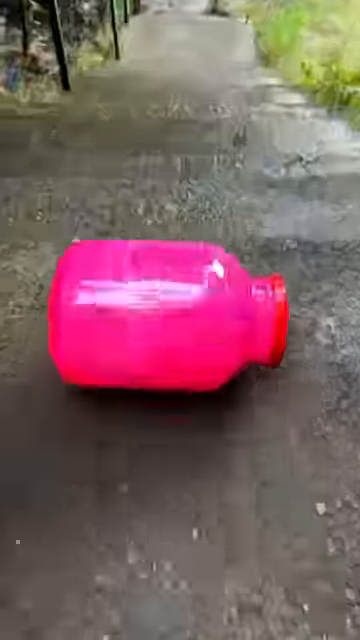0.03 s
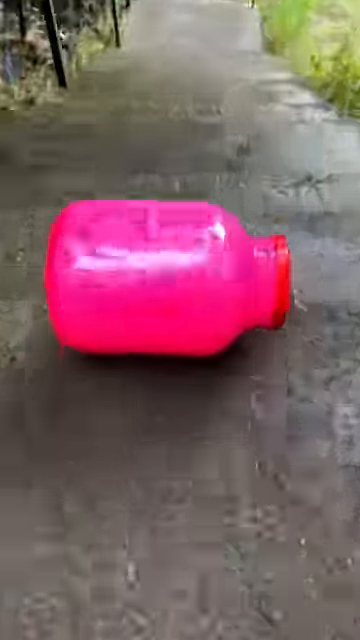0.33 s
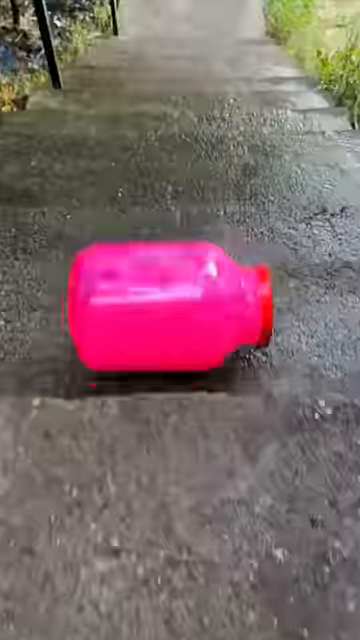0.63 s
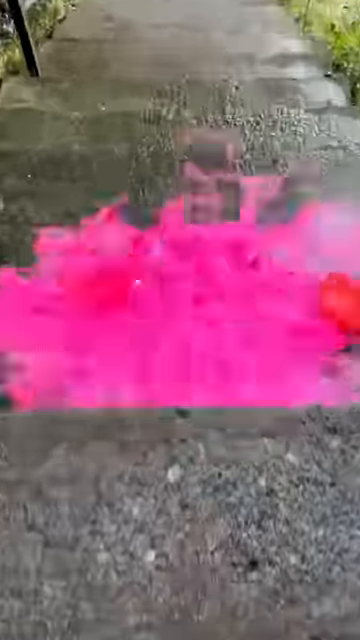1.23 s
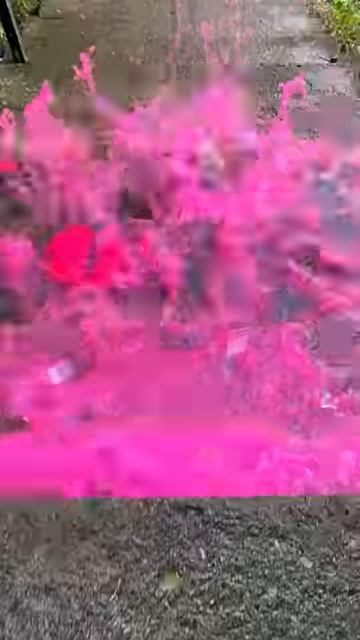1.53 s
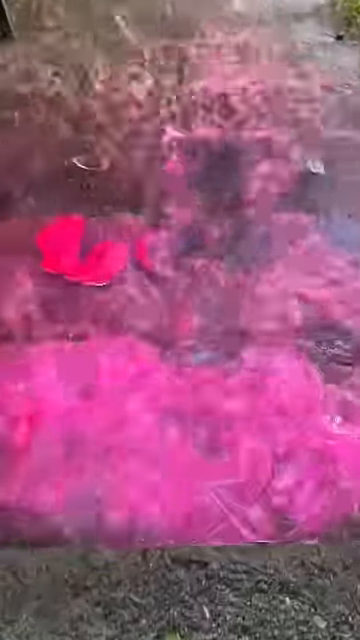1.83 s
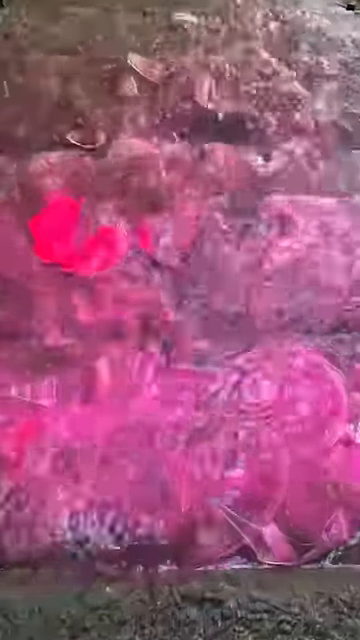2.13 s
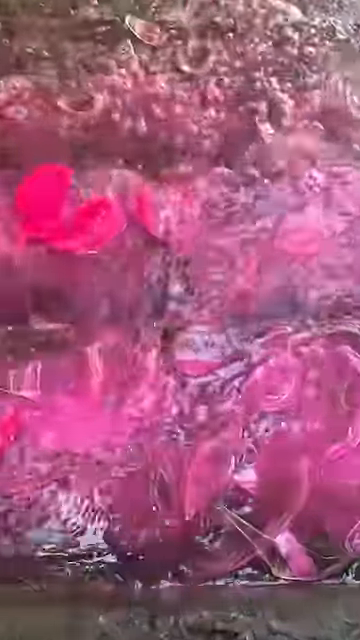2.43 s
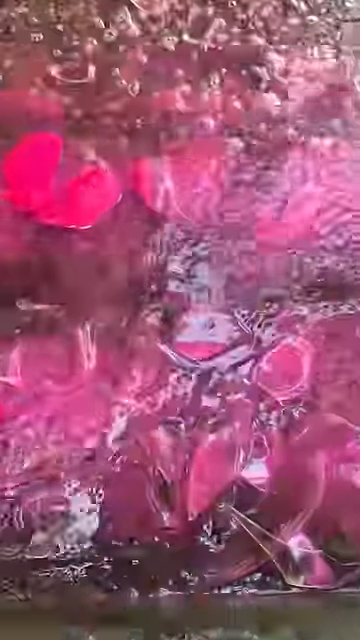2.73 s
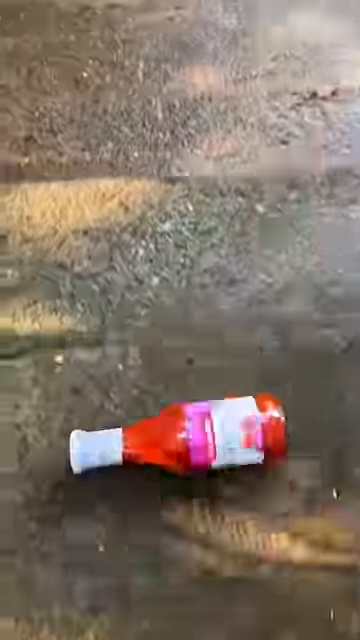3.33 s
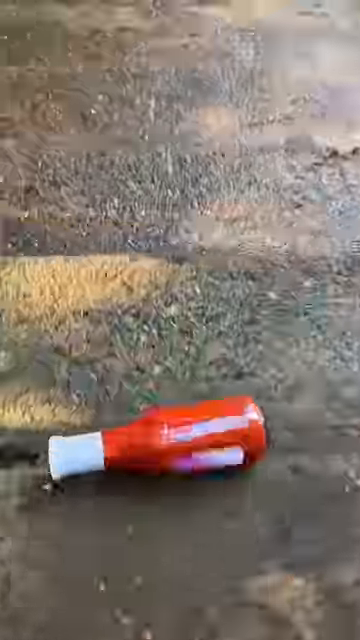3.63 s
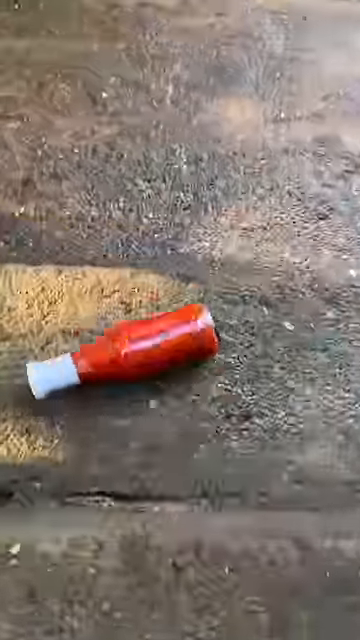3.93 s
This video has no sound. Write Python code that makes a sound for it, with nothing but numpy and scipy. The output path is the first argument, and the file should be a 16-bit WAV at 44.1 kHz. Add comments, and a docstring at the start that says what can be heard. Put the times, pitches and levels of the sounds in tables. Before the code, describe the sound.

A full glass jar rolls and knocks down concrete steps, then shatters. Liquid splashes and shards clatter and tinkle until the last piece settles. A glass bottle then rolls over grit, all heard close up outdoors.

```python
"""Outdoors on concrete steps, close up, on a small recorder with two microphone ports.
A full glass jar rolls down, booming through the slab, knocks, sloshes and bursts on the next tread.
Liquid splashes and bubbles, shards clatter and ring, and one last piece rocks to rest.
Then, a little to the right, a glass bottle rolls over the grit and drops a step."""
import sys
import numpy as np
from scipy import signal
from scipy.fft import rfft, irfft, next_fast_len
from scipy.io import wavfile
from scipy.ndimage import map_coordinates

SR = 44100
rng = np.random.default_rng(int(sys.argv[2]) if len(sys.argv) > 2 else 0)


def inscribe(sig):
    """Save sig as 16-bit PCM at rate SR to the path in sys.argv[1].

    A 1-D sig is mono; a 2-D sig holds one channel per row.
    Samples are clipped to [-1, 1] before scaling.
    """
    pcm = np.round(np.clip(np.atleast_2d(sig).T, -1, 1) * 32767)
    wavfile.write(sys.argv[1], SR, pcm.astype(np.int16))


N = 176400
T = np.arange(N) / SR
EVENT_T = T[:SR // 2]

# Jar glass crushing grit. Each row: frequency in Hz, level in dB.
CRACK_SPECTRUM = [(200, -14.5), (1000, 2.5), (2400, 5), (15500, -4.5)]
# The spill from the jar. Each row: time in seconds, splash in dB, small shards in dB.
SPILL_LEVELS = [(1.11, -39, -60), (1.125, -18, -37), (1.2, -27.5, -30), (1.5, -27.5, -26.5),
                (1.7, -48.5, -26.5), (2.03, -40.5, -32.5), (2.17, -50.5, -37.5), (2.23, -60, -34),
                (2.48, -59, -53)]


def amp(db):
    """Decibels to gain."""
    return 10 ** (np.asarray(db) / 20)


def unit(x):
    """Scale to rms 1."""
    return x / np.sqrt(np.mean(x ** 2) + 1e-20)


def along(points, hz):
    """Interpolate (Hz, value) points on a log axis."""
    f, v = np.transpose(points)
    return np.interp(np.log(hz + 1), np.log(f + 1), v)


def levels(rows):
    """Gain curves from dB columns; silent outside their span unless it nears an end of the scene."""
    s, *columns = np.transpose(rows)
    return [amp(np.interp(T, s, db, left=db[0] if s[0] < .1 else -120,
                          right=db[-1] if s[-1] > 3.9 else -120)) for db in columns]


def wobble(rate):
    """A smooth random curve, rate knots a second."""
    return map_coordinates(rng.standard_normal(4096), [T * rate], mode="wrap")


def filtered(x, response):
    """Pass x through a frequency response."""
    n = x.shape[-1]
    padded = next_fast_len(n + 4096)
    return irfft(rfft(x, padded) * response(np.fft.rfftfreq(padded, 1 / SR)), padded)[..., :n]


def noise(spectrum):
    """Coloured noise of rms 1."""
    return unit(filtered(rng.standard_normal(N), lambda hz: amp(along(spectrum, hz))))


def wavering_tone(hz, depth, rate):
    """A sine whose pitch wanders at random."""
    return np.sin(2 * np.pi * np.cumsum(hz * (1 + depth * wobble(rate))) / SR)


def grit(spectrum, count, size_db):
    """Broad, very short ticks of uneven size and spacing, rms 1."""
    place, size = rng.random((2, count))
    starts = ((np.arange(count) + place) * N / count).astype(int)
    hits = np.bincount(starts, amp(size_db * size ** 2), N)
    bursts = signal.fftconvolve(hits, amp(-60 * EVENT_T / .009))[:N] * rng.standard_normal(N)
    return unit(filtered(bursts, lambda hz: amp(along(spectrum, hz))))


def crack(spectrum, t60, tail_db, tail_t60):
    """Grit crushed at a contact: a sharp coloured burst and a short crumbling tail."""
    t = T[:4096]
    cepstrum = irfft(np.log(amp(along(spectrum, np.fft.rfftfreq(len(t), 1 / SR)))))
    fold = 1 + np.sign(len(t) / 2 - np.arange(len(t)))
    fold[0] = 1
    pulse = irfft(np.exp(rfft(cepstrum * fold)))  # minimum phase keeps the attack sharp
    burst = rng.standard_normal(len(t)) * (amp(-60 * t / t60) + amp(tail_db - 60 * t / tail_t60))
    return signal.fftconvolve(burst, pulse / np.linalg.norm(pulse))[:len(t)]


def thud(hz, t60, spread, flank_db):
    """A heavily damped resonance between two weaker neighbours."""
    t = T[:8192]
    f = hz * np.exp(np.array([[0], [-spread], [spread]]) * rng.uniform(.6, 1.4, (3, 1)))
    waves = np.sin(2 * np.pi * f * t) * amp([[0], [flank_db], [flank_db]]) * [[1], [-1], [-1]]
    return waves.sum(0) * amp(-60 * t / t60) * (1 - np.exp(-2 * hz * t))


def ring(modes, cycles, scatter_db, detune):
    """Glass modes, struck with a new balance each time; high ones tend to die first and detune most."""
    hz, db = np.transpose(modes)[:, :, None]
    size, shift, life = rng.standard_normal((3, len(hz), 1))
    gain = amp(db + scatter_db * size)
    hz = hz * np.exp(detune * shift * hz / hz.mean())
    t60 = cycles / hz * amp(2 * life)
    white = rng.standard_normal((len(hz), len(EVENT_T)))
    flutter = unit(filtered(white, lambda f: np.exp(-(f / (.016 * hz)) ** 2)))
    waves = np.real((1 + .5 * signal.hilbert(flutter)) * np.exp(2j * np.pi * hz * EVENT_T))
    return (gain * waves * amp(-60 * EVENT_T / t60)).sum(0) / np.linalg.norm(gain)


def grains(start, end, count, low_hz, high_hz, cycles, size_db, glide=0):
    """Scattered damped tones, rms 1 over their span."""
    when, pitch, size = rng.random((3, count, 1))
    t = T[:5000]
    hz = low_hz * (high_hz / low_hz) ** pitch
    age = hz * t / cycles
    phase = 2 * np.pi * hz * t * (1 + glide * np.minimum(age, 1))
    waves = amp(size_db * size ** 2 - 60 * age) * np.sin(phase)
    at = ((start + (end - start) * when) * SR).astype(int) + np.arange(len(t))
    return unit(np.bincount(at.ravel(), waves.ravel(), N)[:N]) * np.sqrt((end - start) * SR / N)


def rush(db, hz, rise, t60, slope_db):
    """A grainy swell of noise around one frequency."""
    band = lambda f: amp(-slope_db * np.hypot(np.log2((f + 1) / hz), .5))
    swell = (1 - np.exp(-EVENT_T / rise)) * amp(db - 60 * EVENT_T / t60)
    return swell * unit(filtered(rng.standard_normal(len(EVENT_T)) ** 3, band))


def add(track, s, x):
    """Mix x in at s seconds."""
    part = track[max(0, round(s * SR)):][:len(x)]
    part += x[:len(part)]


def air():
    """Quiet outdoor air, nearly the same at both ports."""
    # Each row: frequency in Hz, level in dB.
    spectrum = [(25, -11), (100, 1.5), (300, -11), (15500, -42)]
    return amp(-54.5) * (noise(spectrum) + 0.1 * np.array([noise(spectrum), noise(spectrum)]))


def yard(x, t60=0.29):
    """A faint answer from steps and walls, thin in the bass and different on each side."""
    tail = rng.standard_normal((2, len(EVENT_T))) * amp(-60 * EVENT_T / t60)
    echo = signal.fftconvolve(x[None], tail / np.linalg.norm(tail[0]), axes=1)[:, :N]
    return filtered(echo, lambda hz: amp(-20) * hz / (hz + 250))


def ports(x, left_db, scatter_t60=0.049):
    """Treble reaches the two ports out of step, and scatter off the nearest tread sets them apart."""
    # Each row: frequency in Hz, lead of the left port in radians.
    phase_lead = [(4600, 0), (8500, -1.7), (11000, -2.8), (15500, -3.8)]
    sides = np.array([[.5], [-.5]])
    tread = rng.standard_normal(len(EVENT_T)) * amp(-60 * EVENT_T / scatter_t60)
    scatter = signal.fftconvolve(x, tread / np.linalg.norm(tread))[:N]
    scatter = filtered(scatter, lambda hz: amp(-12) * hz ** 2 / (hz ** 2 + 300 ** 2))
    pair = filtered(x + 2 * sides * scatter, lambda hz: np.exp(1j * sides * along(phase_lead, hz)))
    return pair * amp(sides * left_db)


def skids():
    """Short hisses of glass sliding over grit."""
    # Each row: start in seconds, level in dB, centre in Hz.
    slides = [(2.852, -43, 8000), (3.769, -35.5, 6500)]
    out = np.zeros(N)
    for s, db, hz in slides:
        add(out, s, rush(db, hz, rise=0.0028, t60=0.19, slope_db=20.5))
    return out


def bottle():
    """The bottle hums, rumbles, crunches and clacks over the rough concrete and drops a step."""
    # Tones of the roll, its rumble and crushed grit. Each row: frequency in Hz, level in dB.
    hum_tones = [(122, -3.5), (184, -2.5)]
    rumble_spectrum = [(25, -6.5), (60, 4.5), (450, 6), (1400, -7), (15500, -45)]
    grit_spectrum = [(2400, 8), (4400, -8), (6100, 0), (11000, -7), (14500, -3)]
    # Each row: time in seconds, level of the roll in dB.
    roll_levels = [(3.075, -50), (3.1, -33.5), (3.52, -33), (3.74, -38), (3.85, -48), (3.92, -39)]
    # Each row: start in seconds, clack pitch in Hz, clack in dB, crack in dB.
    knocks = [(3.109, 1410, -15, -26.5), (3.18, 1480, -16.5, -38), (3.2134, 1270, -6, -29),
              (3.245, 1340, -41, -20), (3.277, 1410, -21.5, -29), (3.314, 1720, -18, -24),
              (3.367, 1590, -27, -27), (3.418, 1480, -26, -29.5), (3.451, 1870, -20.5, -29),
              (3.501, 1915, -11.5, -24), (3.514, 1073, -13.5, -19), (3.58, 1270, -46, -22),
              (3.7569, 1275, -6, -10.5), (3.7765, 1000, -15, -12.5), (3.8761, 2440, -19, -19.5),
              (3.9, 1403, -13.5, -24.5), (3.936, 1100, -24, -27), (3.966, 1450, -19, -27.5)]
    hum = sum(amp(db) * wavering_tone(hz, depth=0.01325, rate=22.2) for hz, db in hum_tones)
    crunch = amp(-11.5) * grit(grit_spectrum, count=280, size_db=19)
    rumble = unit(noise(rumble_spectrum) * amp(2.2 * wobble(110)))
    out = levels(roll_levels)[0] * (hum + crunch + rumble)
    for s, hz, clack_db, crack_db in knocks:
        add(out, s, amp(clack_db) * thud(hz, t60=0.021, spread=0.42, flank_db=-6.5))
        add(out, s, amp(crack_db) * crack(grit_spectrum, t60=0.0092, tail_db=-4, tail_t60=0.013))
    return out


def last_shard():
    """One piece rocks to rest on the concrete, each tap ringing over a faint hiss."""
    # Each row: start in seconds, level in dB.
    taps = [(2.547, -25.5), (2.727, -30.5)]
    # Each row: frequency in Hz, level in dB.
    modes = [(4368, -2), (6037, -10), (7092, 1.5), (10755, -8), (13300, 0)]
    out = np.zeros(N)
    for s, db in taps:
        add(out, s, amp(db) * ring(modes, cycles=1260, scatter_db=3.5, detune=0))
        add(out, s, rush(db - 16.5, hz=6600, rise=0.0041, t60=0.46, slope_db=11.5))
    return out


def shards():
    """Big fragments land and ring amid a tinkle of small ones."""
    # Each row: start in seconds, clack pitch in Hz, then clack, crack and ring in dB.
    landings = [(1.1067, 1820, -17.5, -8, -42.5), (1.125, 2800, -21, -10.5, -23),
                (1.229, 1056, -11, -20, -29), (1.247, 676, -18.5, -9.5, -42), (1.374, 1317, -12, -9.5, -59),
                (1.457, 1035, -9, -7, -19), (1.531, 1210, -15.5, -14, -18.5),
                (1.589, 9050, -14.5, -20, -23), (1.664, 7150, -8, -25, -19),
                (1.673, 3290, -17.5, -16, -13.5), (1.80, 6800, -15.5, -20.5, -19.5),
                (1.881, 6750, -13, -40, -23.5), (1.962, 7640, -12, -37, -27.5),
                (2.015, 1160, -21, -16, -20.5), (2.197, 6600, -7.5, -22.5, -20.5),
                (2.211, 2290, -13.5, -29.5, -22), (2.254, 7900, -26, -49, -33),
                (2.332, 5070, -23, -27, -30)]
    # Modes of the big fragments. Each row: frequency in Hz, level in dB.
    modes = [(1344, -15.5), (1744, -34.5), (2200, -4), (2380, 3.5), (2805, 2), (3199, 4), (4376, 0.5),
             (4804, 3), (5764, 6), (6590, 5.5), (7092, 6.5), (7800, 7.5), (9400, 5.5)]
    _, small_pieces = levels(SPILL_LEVELS)
    tinkle = grains(0.82, 2.5, count=640, low_hz=1346, high_hz=9770, cycles=250, size_db=18.5)
    ticks = grit(CRACK_SPECTRUM, count=500, size_db=12)
    out = small_pieces * (amp(-5.5) * tinkle + amp(-7) * ticks)
    for s, hz, clack_db, crack_db, ring_db in landings:
        add(out, s, amp(clack_db) * thud(hz, t60=0.033, spread=0.238, flank_db=-9.5))
        add(out, s, amp(crack_db) * crack(CRACK_SPECTRUM, t60=0.0091, tail_db=-37.5, tail_t60=0.05))
        add(out, s, amp(ring_db) * ring(modes, cycles=900, scatter_db=4.0, detune=0.026))
    return out


def liquid(burst_s=1.119):
    """The contents slosh in the jar, then thump on the tread and splash; bubbles rise in pitch."""
    # Each row: frequency in Hz, level in dB.
    splash_spectrum = [(100, -28), (400, 2), (2200, 5), (15500, -17.5)]
    # Each row: start in seconds, level in dB, centre in Hz.
    sloshes = [(0.622, -20, 2500), (.655, -24, 2130), (0.759, -25.5, 2460), (.82, -28.5, 2500),
               (1.118, -17, 2870)]
    # Large air pockets closing. Each row: start in seconds, starting pitch in Hz, level in dB.
    glugs = [(.698, 473, -14.5), (1.308, 726, -15), (1.426, 372, -14)]
    splash, _ = levels(SPILL_LEVELS)
    bubbles = grains(1.13, 1.54, count=130, low_hz=296.8, high_hz=1920, cycles=52, size_db=32, glide=.22)
    spatter = amp(3.2 * wobble(420) + 2.5 * wobble(45))
    out = splash * (unit(noise(splash_spectrum) * spatter) + amp(-8) * bubbles)
    for s, db, hz in sloshes:
        add(out, s, rush(db, hz, rise=0.0021, t60=0.11, slope_db=19))
    for s, hz, db in glugs:
        chirp = np.sin(2 * np.pi * hz * EVENT_T * (1 + 2 * EVENT_T))
        add(out, s, amp(db - 60 * EVENT_T / 0.051) * chirp)
    add(out, burst_s, amp(-21.5) * thud(hz=143, t60=0.096, spread=0.55, flank_db=-1))
    return out


def jar(wall_hz=2466, wall_t60=0.057):
    """The heavy jar shakes the slab as it rolls, crunches over grit and knocks on step edges."""
    # Each row: time in seconds, level of the roll in dB.
    roll_levels = [(0, -24.5), (.32, -28), (.43, -35), (.6, -40.5), (.63, -20.5), (.72, -36), (.8, -26.5),
                   (.92, -38), (1.1, -43)]
    # Each row: frequency in Hz, level in dB.
    rumble_spectrum = [(25, -18), (100, 12), (260, -2.5), (800, -4.5), (5000, -29), (15500, -45.5)]
    # Each row: start in seconds, thud pitch in Hz, thud in dB, crack in dB.
    knocks = [(0.044, 586, -10, -22.5), (.157, 1480, -22, -25.5), (0.224, 1930, -39, -18),
              (0.299, 950, -18, -14.5), (0.398, 950, -27, -23.5), (0.6122, 2334, -5, -18.5),
              (.614, 472, -2.5, -23), (.738, 940, -16, -41.5), (0.759, 2110, -11, -28),
              (0.79, 1007, -15, -24)]
    roll, = levels(roll_levels)
    boom = unit(wavering_tone(hz=82.1, depth=.07, rate=32))
    rumble = unit(noise(rumble_spectrum) * amp(4.2 * wobble(130)))
    crunch = grit(CRACK_SPECTRUM, count=260, size_db=17)
    out = roll * boom + amp(8.5) * roll ** 1.285 * rumble + amp(10) * roll ** 2 * crunch
    # The contents damp the glass wall, so it rings only briefly.
    wall_ring = amp(-7.5 - 60 * EVENT_T / wall_t60) * np.sin(2 * np.pi * wall_hz * EVENT_T)
    for s, hz, thud_db, crack_db in knocks:
        add(out, s, amp(thud_db) * thud(hz, t60=0.01 + 11 / hz, spread=0.475, flank_db=-5))
        add(out, s, amp(crack_db) * crack(CRACK_SPECTRUM, t60=0.016, tail_db=-11.5, tail_t60=0.06))
        add(out, s, amp(crack_db) * wall_ring)
    return out


def scene():
    """Jar and spill straight ahead, the bottle a little to the right, over quiet outdoor air."""
    smash = jar() + liquid() + shards() + last_shard() + skids()
    roll = bottle()
    background = air() + yard(smash + roll)
    return background + ports(smash, left_db=.5) + ports(roll, left_db=-2)


def record(dry, top_hz=16000):
    """The recorder rounds off peaks near full scale and cuts steeply above its band limit."""
    rounded = dry / (1 + np.abs(dry) ** 6) ** (1 / 6)
    return filtered(rounded, lambda hz: 1 / (1 + (hz / top_hz) ** 120))


dry = scene()
out = record(dry)
inscribe(out)
```